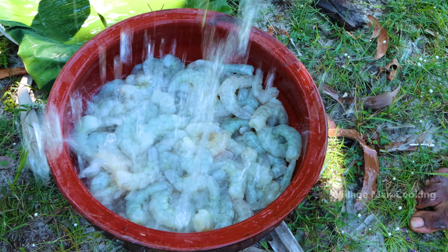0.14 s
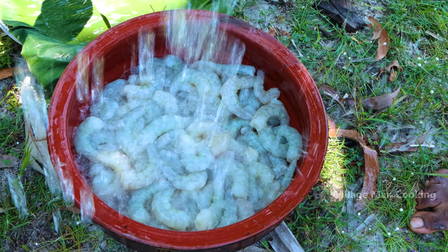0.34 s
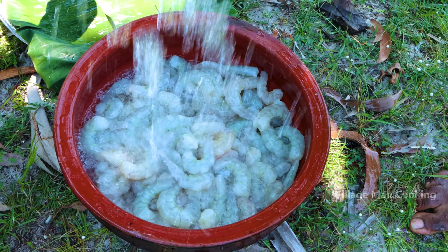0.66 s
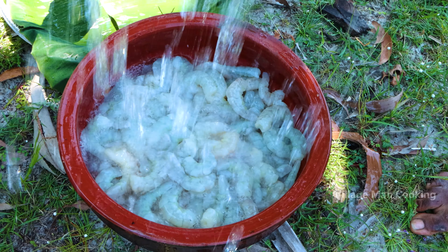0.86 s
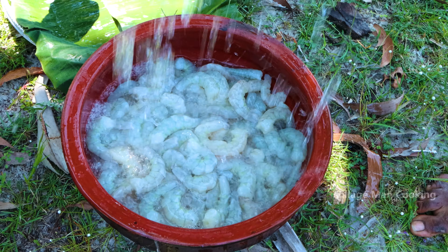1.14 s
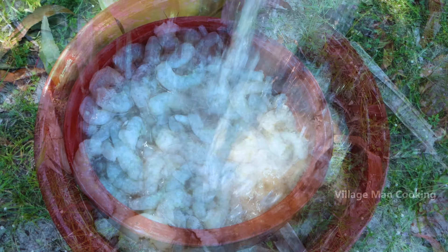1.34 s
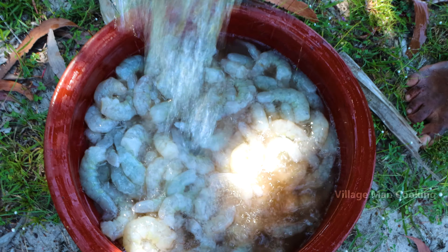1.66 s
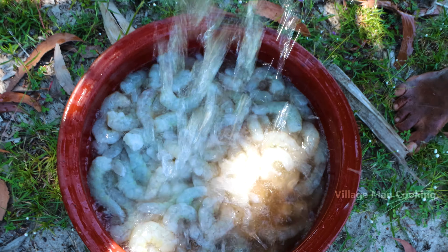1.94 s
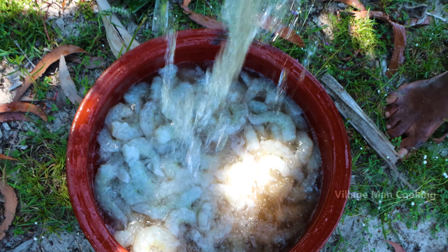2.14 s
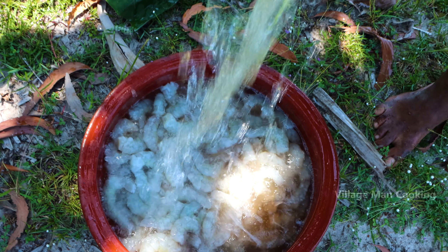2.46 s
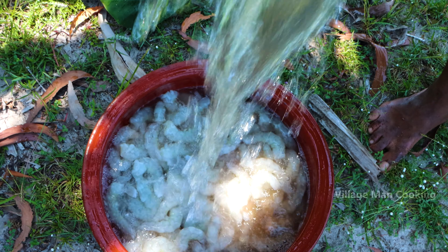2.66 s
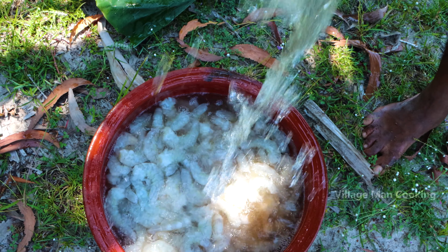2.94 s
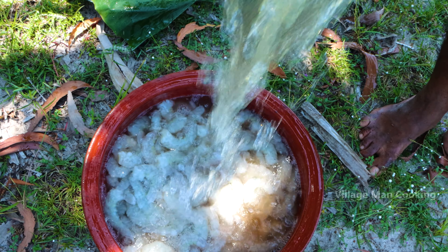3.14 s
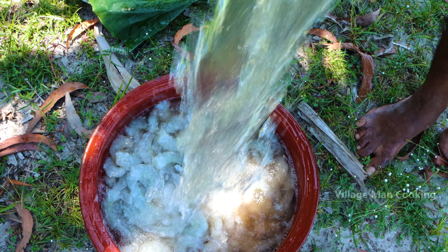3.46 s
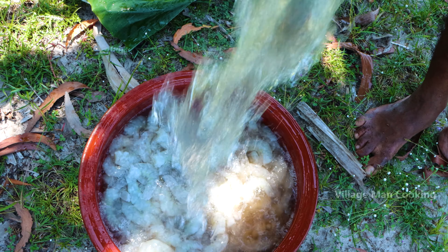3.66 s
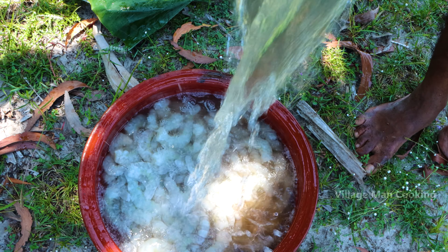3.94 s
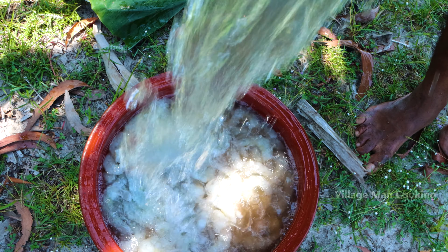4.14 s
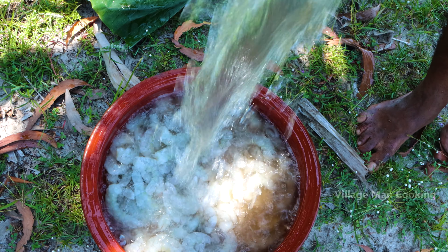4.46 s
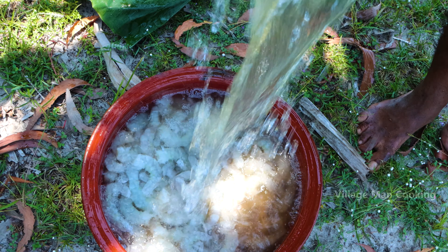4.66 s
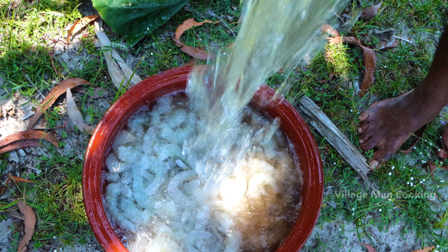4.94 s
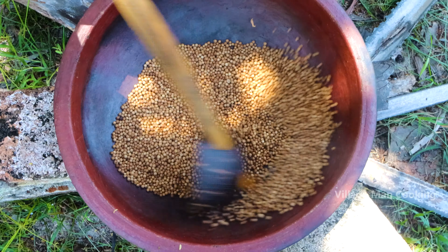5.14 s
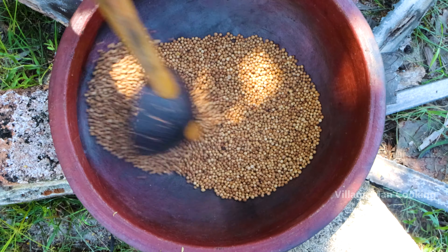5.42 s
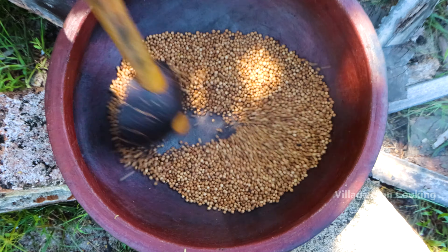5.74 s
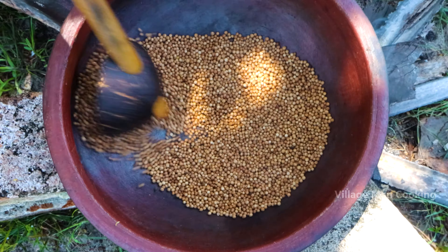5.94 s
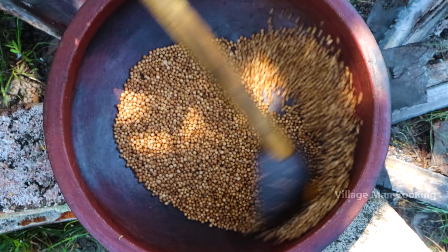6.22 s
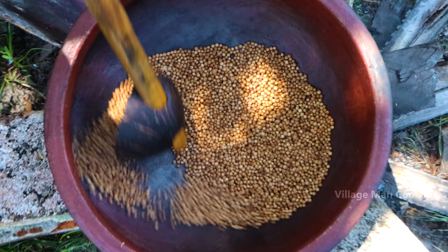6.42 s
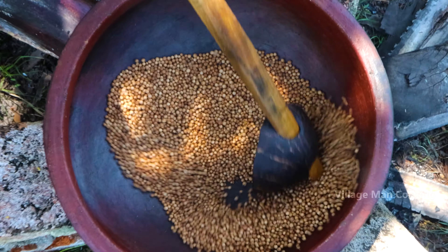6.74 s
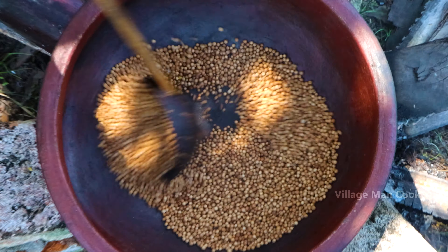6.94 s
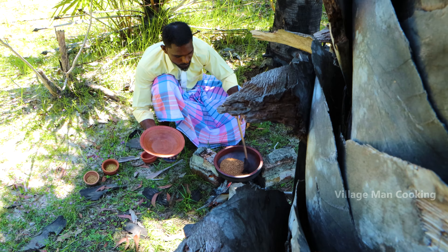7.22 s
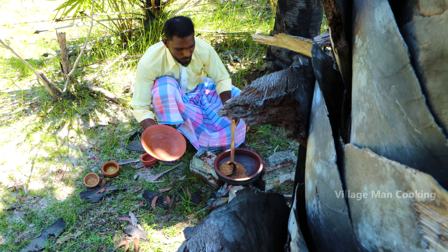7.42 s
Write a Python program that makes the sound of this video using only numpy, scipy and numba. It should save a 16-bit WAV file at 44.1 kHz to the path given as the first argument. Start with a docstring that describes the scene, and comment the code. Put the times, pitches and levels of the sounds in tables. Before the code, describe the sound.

Close stereo microphone outdoors, dry and without echo. Bright, dense water drops hit a full clay bowl, with a brief metallic pail knock. A quieter trickling stream continues with bubbling surges and soft metal ticks. Abruptly, a ladle grates back and forth on hollow clay, seeds rattling and hissing, two sharp knocks standing out. The strokes stop, leaving faint yard air, dull thuds and soft low flutter.

```python
"""Outdoor yard: water is thrown, then poured, from a metal pail into a clay bowl full of shellfish.
Later a ladle scrapes dry seeds round a clay pot over a fire. Drops and seed ticks are short sines over
coloured noise; air pockets are sliding sines; pail and clay are struck or rubbed resonances.
Thrown water, poured stream and stirring each have their own stereo place; the pour shades the left port."""
import sys
import numpy as np
from scipy import signal
from scipy.fft import rfft, irfft, next_fast_len
from scipy.io import wavfile
from scipy.ndimage import uniform_filter1d
from numba import njit

SR = 44100
rng = np.random.default_rng(int(sys.argv[2]) if len(sys.argv) > 2 else 0)


def dump(signal):
    """Clip the signal to [-1, 1] and save it as 16-bit WAV at the path in sys.argv[1]."""
    limited = np.clip(np.atleast_2d(signal).T, -1, 1)
    pcm = np.round(limited * 32767).astype(np.int16)
    wavfile.write(sys.argv[1], SR, pcm)


N = 334259

# yard air spectrum: (frequency [Hz], density [dB])
YARD_COLOUR = [(30, -42), (80, 0), (330, -17), (1100, -16), (2750, -12.5), (6900, -19), (10500, -27.5),
               (12500, -19.5), (16000, -36)]
YARD_DB = -60.5
# thrown water, patter: (time [s], level [dB])
SPRAY_LEVEL = [(0, -21), (.08, -28), (.13, -33), (.2, -24.5), (.53, -30), (.66, -38.5), (.7, -27.5),
               (.97, -28), (1.02, -23), (1.14, -26.5), (1.21, -36.5), (1.33, -53)]
# thrown water, spectrum: (frequency [Hz], density [dB])
SPRAY_COLOUR = [(180, -47.5), (450, -42.5), (800, -11.5), (1640, -4), (2610, 2), (7690, -5), (13300, -21.5),
                (16000, -29.5)]
# thrown water, stereo: (frequency [Hz], left minus right [dB])
SPRAY_BALANCE = [(100, 2.5), (1000, -4.5), (10000, -4.5)]
# big drops slapping the surface: (time [s], level [dB], pitch [Hz])
SLAPS = [(0.0034, 0, 3860), (0.022, -7.5, 2330), (0.0416, -4.5, 4800), (0.077, -6, 2230),
         (0.0929, -1.5, 2870), (0.199, -8, 3500), (0.2188, -4.5, 2390), (0.286, -8, 4500),
         (0.3582, -4, 2500), (0.387, -10, 3560), (0.451, -5, 2160), (0.5343, -4, 2900), (0.685, -2.5, 2090),
         (0.728, -8, 2300), (0.854, -5, 2520), (0.9147, -5, 2800), (1.007, -1, 4620), (1.1032, 2, 4480),
         (1.121, -4, 3140), (1.163, -3.5, 5170), (1.2663, -6.5, 3380), (1.802, -20, 2780),
         (1.936, -10, 2650), (2.0036, -15, 2565), (2.1322, -5, 2600), (3.225, -15.5, 1800),
         (3.236, -16, 2560), (3.3096, -10.5, 5540), (3.447, -14, 2760), (3.471, -12.5, 2750),
         (3.605, -14.5, 5400), (3.634, -25, 1850), (4.166, -17, 2150), (4.826, -19, 2470),
         (4.979, -8, 2130), (5.062, -23, 2960), (5.079, -15.5, 3400), (5.155, -17.5, 2330)]
# air pockets: (time [s], level [dB], first pitch [Hz], last pitch [Hz], t60 [s])
BUBBLES = [(0.022, -12, 1120, 1035, 0.021), (0.211, -23, 1060, 1100, 0.065), (.245, -27, 750, 585, 0.14),
           (0.471, -22.5, 308, 332, 0.083), (0.472, -1.5, 980, 1080, 0.0073), (0.523, 1, 816, 1180, 0.017),
           (0.555, -19, 545, 610, 0.038), (0.615, -22.5, 450, 1000, 0.064), (0.682, -22, 121, 222, 0.17),
           (0.77, -23, 700, 770, 0.054), (1.196, -15.5, 880, 1320, 0.035), (1.294, -19.5, 554, 503, 0.051),
           (1.367, -25.5, 1040, 1200, 0.036), (2.003, -9, 668, 544, 0.1), (2.097, -18.5, 970, 1310, 0.063),
           (2.096, -14, 290, 307, 0.017), (2.171, -25.5, 185.5, 112, 0.073), (3.116, -21.5, 130, 485, 0.07),
           (3.156, -13.5, 426, 382, 0.071), (3.445, -16.5, 225, 258, 0.024), (3.457, -29, 1000, 1290, 0.13),
           (3.504, -15.5, 630, 527, 0.028), (3.503, -20, 1326, 1420, 0.041),
           (3.532, -23.5, 507, 460, 0.046), (3.605, -23.5, 230, 194, 0.076), (4.008, -17, 150, 447, 0.039),
           (4.09, -9.5, 277, 270, 0.031), (4.1, -27.5, 571, 703, 0.096), (4.165, -17, 1350, 1240, 0.035),
           (4.162, -22.5, 115, 116, 0.066), (4.333, -14.5, 1050, 1030, 0.018), (4.33, -24, 288, 303, 0.048),
           (4.474, -24, 860, 1380, 0.056), (4.471, -24, 136, 130, 0.032), (4.57, -9.5, 1160, 1070, 0.018),
           (4.573, -28.5, 260, 520, 0.06), (4.613, -15, 492, 580, 0.042), (4.671, -25.5, 105, 80, 0.04),
           (4.705, -23, 883, 1090, 0.081), (4.172, -31, 660, 1010, 0.057), (4.827, -13, 1240, 1320, 0.013),
           (4.975, -8.5, 1250, 1320, 0.013), (4.978, -22, 322, 298, 0.068), (5.109, -33.5, 810, 1280, 0.05)]
GLIDE_HOLD_PER_OCTAVE = 0.67  # added to the fade exponent of a climbing pocket
# pail knocks, rung until wet hands or water damp them:
# (time [s], level [dB], rattle length [s], damped after [s])
CLINKS = [(0.472, -16, 0.0035, 0.065), (2.098, -29, 0.0063, 0.098), (4.345, -29.5, 0.023, 0.056),
          (4.985, -24.5, 0.029, 0.062)]
# pail modes: (frequency [Hz], level [dB], time to fall 56 dB [s])
PAIL_MODES = [(1657, -5.5, 0.2), (1723, -7.5, 0.024)]
# poured stream, patter: (time [s], level [dB])
POUR_LEVEL = [(1.2, -42), (1.7, -42.5), (1.9, -39.5), (2.1, -41.5), (3.3, -41), (3.5, -39), (3.75, -41.5),
              (4.2, -42), (4.4, -36.5), (4.54, -42.5), (4.65, -37.5), (5.2, -45.5)]
# poured stream in the bowl's resonances, spectrum: (frequency [Hz], density [dB])
POUR_COLOUR = [(530, -44), (900, -21.5), (1600, -21), (1970, -3.5), (2170, -11), (2760, -2), (3960, -19.5),
               (4630, -9.5), (6250, -20.5), (13000, -18.5), (16000, -36.5)]
# small bubbles and slop, spectrum: (frequency [Hz], density [dB])
GURGLE_COLOUR = [(40, -12), (110, -12.5), (280, -7.5), (650, 6), (1500, -12)]
# poured stream, stereo: (frequency [Hz], left minus right [dB])
POUR_BALANCE = [(100, 0.5), (400, -9.5), (2400, -22.5), (4400, -17.5), (8000, -60.5)]
# surges dragging air under: (peak time [s], rise [s], fall [s], gurgle [dB], deep slosh [dB])
SURGES = [(1.22, 0.086, 0.23, -40.5, -50.5), (3.16, 0.03, 0.09, -43, -40), (3.62, 0.16, 0.087, -36.5, -39),
          (4.12, 0.24, 0.16, -40, -48), (4.36, 0.057, 0.07, -40.5, -68), (4.9, 0.52, 0.42, -43.5, -83)]
GURGLE_REST_DB, SURGE_BEND = -54.5, 0.92
# deep slosh resonance: (frequency [Hz], width [Hz], level [dB])
SLOSH_MODES = [(144, 111, 0)]
# thin high shimmer over the stream, perhaps insects: (peak time [s], rise [s], fall [s], level [dB])
SHIMMER = [(1.45, 0.7, 0.75, -42)]
# shimmer band: (frequency [Hz], width [Hz], level [dB])
SHIMMER_MODES = [(13100, 670, 0)]
# ladle strokes: (peak time [s], rise [s], fall [s], scrape [dB], lowest pot mode [dB], rim ring [dB],
# seed hiss [dB], low wall [dB], finest ticks [dB])
STROKES = [(5.2, 0.08, 0.33, -41.5, -55, -43, -41, -71, -38),
           (5.359, 0.11, 0.091, -27.5, -41, -39, -50, -33.5, -53),
           (5.608, 0.11, 0.09, -35.5, -42, -25.5, -33.5, -43, -35),
           (5.826, 0.09, 0.064, -17, -27.5, -26, -31, -29, -34),
           (6.129, 0.064, 0.099, -25.5, -33, -25, -22, -36.5, -27.5),
           (6.322, 0.073, 0.23, -44, -56, -34, -37.5, -53, -41),
           (6.44, 0.061, 0.14, -36, -44, -62, -43.5, -44.5, -46),
           (6.699, 0.093, 0.051, -49, -48, -45, -41.5, -51, -52),
           (6.8, 0.099, 0.15, -41.5, -72, -37.5, -33, -51.5, -34.5),
           (6.996, 0.066, 0.089, -39, -53, -26.5, -36.5, -47.5, -32.5),
           (7.058, 0.045, 0.027, -27.5, -29.5, -29, -40, -48.5, -49)]
STROKE_BEND = 1.315
# seeds still rolling between strokes: (time [s], scrape [dB], lowest pot mode [dB], rim ring [dB],
# seed hiss [dB], low wall [dB], finest ticks [dB])
STIR_REST = [(5.14, -58, -61, -60, -55.5, -53.5, -49), (7.25, -67, -70.5, -77, -60, -80, -59.5)]
# pot body modes, lowest first: (frequency [Hz], width [Hz], level [dB])
POT_MODES = [(1243, 41.6, 0), (1647, 220, -4.5), (1790, 150, 1), (2070, 430, -7.5)]
# pot rim modes: (frequency [Hz], width [Hz], level [dB])
RIM_MODES = [(2667, 243, 2.5), (2788, 300, -1)]
# low pot wall modes: (frequency [Hz], width [Hz], level [dB])
WALL_MODES = [(315, 98, 1.5), (550, 237, 5)]
# seeds, spectrum: (frequency [Hz], density [dB])
SEED_COLOUR = [(1940, -20.5), (3300, -17), (4130, 5.5), (5380, -6), (7340, 5), (9620, -6), (12000, 1),
               (16000, -13)]
SEED_TOP_HZ = 10000  # finest ticks lie above
# stirring, stereo: (frequency [Hz], left minus right [dB])
STIR_BALANCE = [(100, 3.5), (2500, -6.5), (8000, -6.5), (14000, -2)]
# ladle knocks on the wall: (time [s], level [dB])
KNOCKS = [(5.28, -25), (5.653, -21.5), (5.73, -23), (6.107, -22), (6.133, -5.5), (6.176, -28), (6.32, -22),
          (6.382, -17.5), (6.422, -20), (6.757, -18.5), (6.796, -24), (6.813, -4.5), (6.99, -29)]
# dull thuds on the pot: (time [s], level [dB], mid-slide pitch [Hz])
THUDS = [(5.994, -32, 330), (7.247, -48, 169), (7.294, -41.5, 256)]
# fire flutter: (time [s], level [dB])
FIRE_LEVEL = [(7.22, -74), (7.26, -53.5), (7.4, -53.5), (7.58, -74.5)]
# fire spectrum: (frequency [Hz], density [dB])
FIRE_COLOUR = [(40, -22.5), (100, 7.0), (300, 2.5), (700, -35.0), (3000, -86)]

HITS_SHADED_FROM_S = 1.27  # later slaps, pockets and clinks share the pour's place
REPEAT_S, REPEAT_LENGTH_S = 1.28, .92  # this stretch of the stream sounds twice in a row
TOP_HZ = 16300


def undb(db):
    """Amplitude ratio of a level in dB."""
    return 10 ** (np.asarray(db) / 20)


def unit(x):
    """Scale to rms 1."""
    return x / np.sqrt(np.mean(x ** 2))


def curves(table):
    """Level columns at every sample; the first is silent outside the table."""
    t = np.arange(N) / SR
    s, *columns = np.transpose(table)
    out = [np.interp(t, s, c) for c in columns]
    out[0] = np.interp(t, s, columns[0], -120, -120)
    return out


def shape(table, hz):
    """Spectrum in dB at hz, interpolated over log frequency."""
    f, db = np.transpose(table)
    return np.interp(np.log(hz + 1), np.log(f), db)


def colour(x, table):
    """Filter x by a spectrum table with minimum phase, via the folded cepstrum."""
    size = 2 * next_fast_len(N // 2 + 1)
    hz = np.arange(size // 2 + 1) * SR / size
    cepstrum = irfft(shape(table, hz) * np.log(10) / 20, size)
    cepstrum[1:size // 2] *= 2
    cepstrum[size // 2 + 1:] = 0
    response = np.exp(rfft(cepstrum))
    return irfft(rfft(x, size) * response, size)[..., :N]


def walk(rate_hz):
    """Random levels joined by ramps of 1 / rate_hz s; spread near 1.7."""
    k = int(SR / rate_hz)
    held = np.repeat(rng.standard_normal(N // k + 1), k)
    return 2.08 * uniform_filter1d(held, k)[:N]


def grit(db):
    """Noise in which about one sample in twenty sticks out as a click."""
    excess_db = -db * np.log(1 - .99 * rng.random(N))
    return rng.standard_normal(N) * undb(excess_db * (rng.random(N) < .05))


def hiss(table, alike, grit_db=0.):
    """Coloured noise in two ports with correlation alike; rms 1."""
    a, b = grit(grit_db), grit(grit_db)
    alike = np.clip(alike, 0, 1)
    left = alike * a + np.sqrt(1 - alike ** 2) * b
    return unit(colour(np.array([left, a]), table))


def swells(table, bend):
    """Gain per level column: each row rises to its peak and falls, 20 dB down at its rise or fall time."""
    s, rise, fall, *levels = np.transpose(table)
    t = np.arange(0, N / SR + .002, .001)
    late = t - s[:, None]
    drop_db = 20 * np.abs(late / np.where(late < 0, rise[:, None], fall[:, None])) ** bend
    gains = []
    for db in levels:
        power = (undb(db[:, None] - drop_db) ** 2).sum(axis=0)
        gains.append(np.interp(np.arange(N) / SR, t, np.sqrt(power)))
    return gains


def clumps(per_s, decay_s, spread_db, bed):
    """Gain that jumps at random moments and dies back to a steady bed; rms 1."""
    hit = rng.random(N) < per_s / SR
    jumps = hit * undb(-spread_db * np.log(1 - .9 * rng.random(N)))
    decays = signal.lfilter([1], [1, -np.exp(-1 / (decay_s * SR))], jumps)
    return unit(bed + unit(decays))


def resonate(x, modes, wander_db=0.):
    """Steep band-passes, two per mode; the halves swell and fade apart, shifting its centre; rms 1."""
    out = 0
    for hz, width, db in modes:
        for half_hz in hz + width / 4 * np.array([-1, 1]):
            b, a = signal.iirpeak(half_hz, hz / width, SR)
            band = unit(signal.lfilter(b, a, signal.lfilter(b, a, x)))
            out = out + undb(db + wander_db * (walk(35) + walk(7))) * band
    return unit(out)


@njit
def ring(out, s, size, hz, end_hz, t60, lag, hold):
    """Add dying sines sliding to end_hz over half of t60 [s]; hold above 1 delays the fade.
    The left port is lag samples later, or earlier where negative."""
    for g in range(len(s)):
        count = max(int(t60[g] * SR), 1)
        slide = (end_hz[g] / hz[g]) ** (2. / count)
        start, late = int(s[g] * SR), int(lag[g])
        phase, f = 0., hz[g]
        for i in range(count):
            attack = min(phase / 6., 1.)
            v = size[g] * np.sin(phase) * attack * .001 ** ((i / count) ** hold)
            if 0 <= start + i + min(late, 0) and start + i + max(late, 0) < out.shape[1]:
                out[0, start + i + late] += v
                out[1, start + i] += v
            phase += 2 * np.pi * f / SR
            if 2 * i < count:
                f *= slide
    return out


def grains(span_s, per_s, low_hz, high_hz, table, cycles, spread_db, rise, lag_spread):
    """Random short sines, a few far louder; rise is a pitch fraction, lag_spread is in samples."""
    length_s = span_s[1] - span_s[0]
    u = rng.random((int(per_s * length_s), 5)).T
    s = span_s[0] + u[0] * length_s
    hz = low_hz * (high_hz / low_hz) ** u[1]
    size = undb(shape(table, hz) - spread_db * np.log(1 - .995 * u[2])) * hz
    end_hz = hz * (1 + rise * u[4])
    t60 = cycles * (.5 + u[4]) / hz
    out = ring(np.zeros((2, N)), s, size, hz, end_hz, t60, lag_spread * (u[3] - .5), 1.0)
    return unit(out) * np.sqrt(length_s * SR / N)  # rms 1 within the span


def place(x, balance, lag):
    """Shade the left port and delay it by lag samples; the mean of both port gains stays 1."""
    right = [(hz, -20 * np.log10((1 + undb(db)) / 2)) for hz, db in balance]
    left = [(hz, db + r) for (hz, db), (_, r) in zip(balance, right)]
    return np.array([np.roll(colour(x[0], left), lag), colour(x[1], right)])


def yard():
    """Leaves, insects and far air: broad coloured noise whose level wanders."""
    return hiss(YARD_COLOUR, .5) * undb(YARD_DB + 1.5 * walk(6))


def spray():
    """Thrown water breaks into drops that come in clumps, over a fine mist."""
    drops = grains((0, 1.5), 2600, 450, 6880, SPRAY_COLOUR, 17.0, 0.9, 0.14, 5.6)
    fine = grains((0, 1.5), 5000, 6800, 13500, SPRAY_COLOUR, 23.0, 5.7, 0.053, 3.8)
    mist = hiss(SPRAY_COLOUR, 0.65, 2.5)
    patter = clumps(130, 0.0045, 7.5, 0.47) * (drops + mist)
    fine_patter = clumps(280, .004, 2.5, 0.27) * fine * undb(-4.0)
    return undb(curves(SPRAY_LEVEL)[0]) * (patter + fine_patter)


def slaps():
    """A big drop slaps the surface: a contact crack, one short tone and a burst of smaller drops."""
    s, db, hz = np.transpose(SLAPS)
    ones = np.ones_like(s)
    out = ring(np.zeros((2, N)), s, undb(db), hz, 0.99 * hz, 26 / hz, 0 * s, 0.9)
    ring(out, s - .0004, undb(db - 22.5), 13000 * ones, 1500 * ones, 0.00283 * ones, 0 * s, 0.2)  # crack
    for u in rng.random((len(s), 12, 4)).transpose(1, 2, 0):
        burst_hz = hz * 2 ** (1.9 * u[1] - .6)
        size = undb(db - 16 - 3.4 * u[0] - 6.6 * u[2])
        ring(out, s + 0.015 * u[0] ** 3, size, burst_hz, burst_hz, 25 / burst_hz, 8 * (u[3] - .5), 0.84)
    return out


def air_pockets():
    """Trapped air rings, slides and wavers; each pocket drags a few smaller, shorter ones under."""
    s, db, hz, end_hz, t60 = np.transpose(BUBBLES)
    out = np.zeros((2, N))
    for row in np.transpose([s, undb(db), hz, end_hz, t60, 0 * s])[:, :, None]:
        climb_octaves = max(np.log2(row[3, 0] / row[2, 0]), 0)
        ring(out, *row, 1 + GLIDE_HOLD_PER_OCTAVE * climb_octaves)
    for u in rng.random((len(s), 5, 2)).transpose(1, 2, 0):
        small_hz = hz * 2 ** (2.5 * u[1] - 1)
        size = undb(db - 12.5 - 4.7 * u[0])
        ring(out, s + .04 * u[0] ** 2, size, small_hz, 1.21 * small_hz, 12 / small_hz, 0 * s, 1.0)
    return out * undb(1.2 * walk(160))


def pail():
    """A short rattle of contacts feeds the pail's modes; water slops with the blow."""
    out = np.zeros(N)
    slop = colour(grit(2.5), GURGLE_COLOUR[2:])
    t = np.arange(int(.2 * SR)) / SR
    body = sum(undb(db) * np.sin(2 * np.pi * hz * t) * 0.0015 ** (t / fall_s)
               for hz, db, fall_s in PAIL_MODES)
    for s, db, rattle_s, damped_s in CLINKS:
        here = slice(int(s * SR), int(s * SR) + len(t))
        push = rng.standard_normal(len(t)) * (t < rattle_s)
        sound = signal.fftconvolve(push, body)[:len(t)] * undb(1.5 * walk(120)[here])
        sound *= 1 / (1 + np.exp((t - damped_s) / 0.0048))
        sound += 0.16 * np.std(sound[:900]) * slop[here] * np.exp(-t / 0.036)
        out[here] += undb(db) * sound / np.sqrt(np.mean(sound[:2000] ** 2))
    return np.array([out, out])


def pour():
    """The stream patters in the bowl's fixed resonances; small bubbles gurgle and water sloshes below."""
    db = curves(POUR_LEVEL)[0]
    low, deep = swells(SURGES, SURGE_BEND)
    low = np.hypot(low, undb(GURGLE_REST_DB))
    slosh = deep * resonate(grit(3.4), SLOSH_MODES) * undb(2.7 * walk(30))
    drops = grains((1.2, 5.25), 1800, 796, 8440, POUR_COLOUR, 29.0, 2.5, 0.038, 8.2)
    fine = grains((1.2, 5.25), 4000, 4680, 13860, POUR_COLOUR, 42.0, 6.1, 0.02, 2.77)
    mist = hiss(POUR_COLOUR, 0.88, 2.7) * undb(-6)
    patter = clumps(170, .007, 6., .65) * undb(2.5 * walk(14)) * (drops + mist)
    fine_patter = clumps(130, 0.0037, 2.8, 0.23) * fine * undb(-6.5)
    bubbles = grains((1.2, 5.25), 600, 69.7, 1677, GURGLE_COLOUR, 24.9, 1.3, 0.515, 0.)
    bubbles = bubbles + undb(-8.5) * hiss(GURGLE_COLOUR, 1.0)
    gurgle = bubbles * low * undb(3.9 * walk(25)) * (db > -100)  # only while pouring
    return slosh + undb(db) * (patter + fine_patter) + gurgle


def shimmer():
    """A thin high noise band, independent in each port, swells over the stream."""
    bands = np.array([resonate(grit(17.0), SHIMMER_MODES) for _ in range(2)])
    return swells(SHIMMER, SURGE_BEND)[0] * bands


def stir():
    """The ladle judders over the clay and rings the pot; seeds tick against wall and each other."""
    rest = curves(STIR_REST)
    on = rest[0] > -100
    strokes = swells(STROKES, STROKE_BEND)
    scrape, deep, rim, seed, wall, top = (on * np.hypot(g, undb(db)) for g, db in zip(strokes, rest))
    judder = clumps(260, 0.0035, 2.5, 1.02)  # one uneven drag shakes the whole pot
    rub = [grit(7.3) * judder for _ in range(3)]
    clay = resonate(rub[0], POT_MODES[1:], 1.95) * scrape
    clay = clay + resonate(rub[0], POT_MODES[:1]) * deep
    clay = clay + resonate(rub[1], RIM_MODES, 3.8) * rim
    clay = clay + resonate(rub[2], WALL_MODES, 2.0) * wall
    seeds = grains((5.1, 7.2), 5000, 2610, 19500, SEED_COLOUR, 60.0, 1.1, 0., 22.0)
    seeds = seeds + undb(-8.0) * hiss(SEED_COLOUR, 0.87, 2.34)
    coarse = signal.sosfiltfilt(signal.butter(2, SEED_TOP_HZ, fs=SR, output="sos"), seeds)
    return clay + (coarse * seed + (seeds - coarse) * top) * clumps(400, 0.0057, 3.6, 0.84)


def knocks():
    """A ladle knock is a falling chirp that throws a handful of seeds at the wall within 16 ms."""
    s, db = np.transpose(KNOCKS)
    ones = np.ones_like(s)
    out = ring(np.zeros((2, N)), s, undb(db), 9000 * ones, 2500 * ones, 0.00694 * ones, 0 * s, 0.87)
    for u in rng.random((len(s), 24, 3)).transpose(1, 2, 0):
        hz = 1500 * 6.85 ** u[1] ** 1.39
        size = undb(db - 16.0 - 5.2 * u[0])
        ring(out, s + 0.016 * u[0] ** 3, size, hz, hz, 30 / hz, 10 * (u[2] - .5), 0.95)
    return out


def thuds():
    """A dull thud on the pot is a low sine sliding down two octaves."""
    s, db, hz = np.transpose(THUDS)
    return ring(np.zeros((2, N)), s, undb(db), 2 * hz, hz / 2, 14 / hz, 0 * s, 0.89)


def fire():
    """Low noise in irregular puffs: the fire flutters at the end."""
    return hiss(FIRE_COLOUR, 0.48) * undb(curves(FIRE_LEVEL)[0]) * clumps(45, 0.016, 3., 0.5)


def scene():
    """Thrown water, poured stream and stirring, each placed in stereo, over yard and fire."""
    early = np.arange(N) < HITS_SHADED_FROM_S * SR
    hits = slaps() + air_pockets() + pail()
    thrown = spray() + hits * early
    stream = pour() + shimmer() + hits * ~early
    a, length = int(REPEAT_S * SR), round(REPEAT_LENGTH_S * SR)
    stream[:, a + length:a + 2 * length] = stream[:, a:a + length]
    pot = stir() + knocks() + thuds()
    return (yard() + place(thrown, SPRAY_BALANCE, lag=1) + place(stream, POUR_BALANCE, lag=-1)
            + place(pot, STIR_BALANCE, lag=1) + fire())


def record(dry):
    """The loudest peaks clip; the top is cut."""
    lowpass = signal.ellip(10, .2, 80, TOP_HZ, fs=SR, output="sos")
    return signal.sosfilt(lowpass, np.clip(dry, -.9, .9))


dry = scene()
out = record(dry)
dump(out)
```